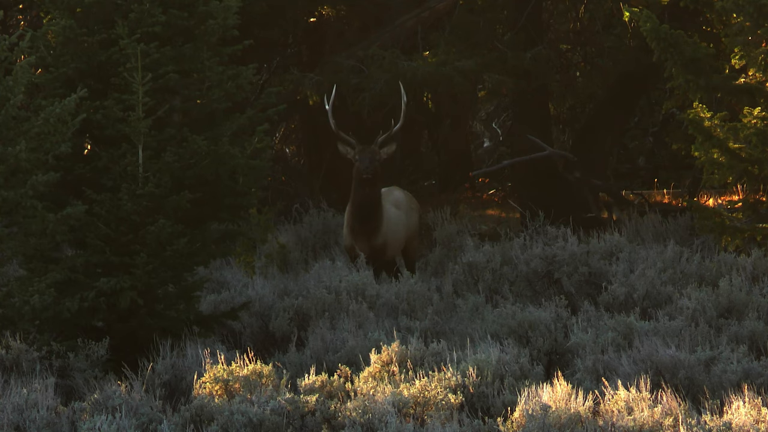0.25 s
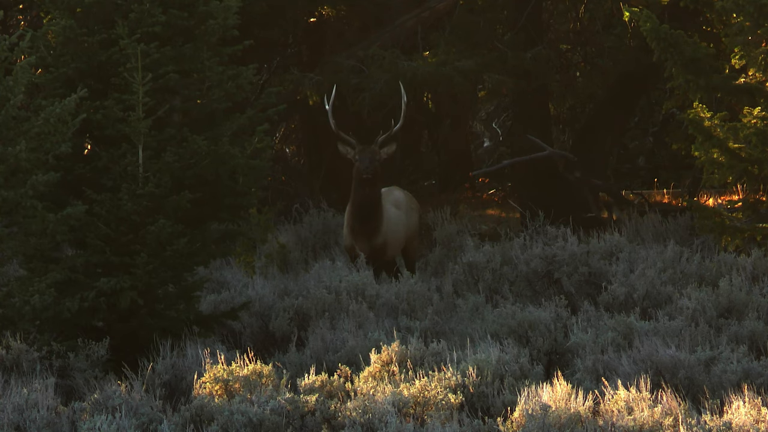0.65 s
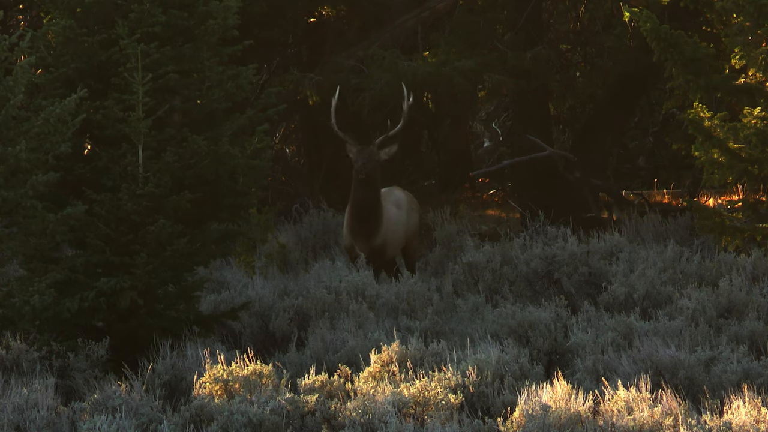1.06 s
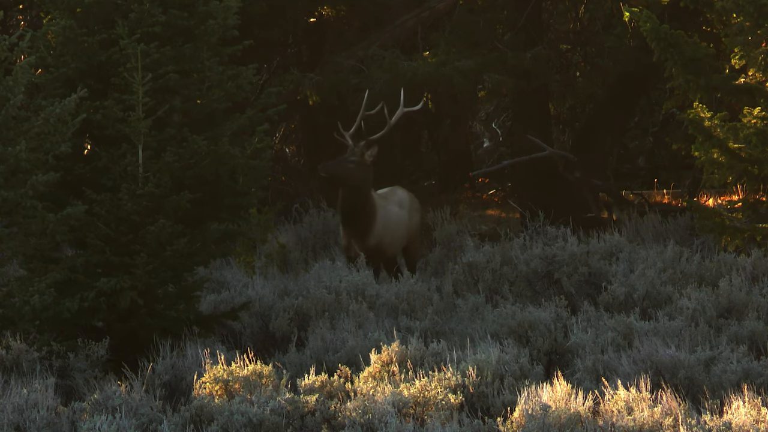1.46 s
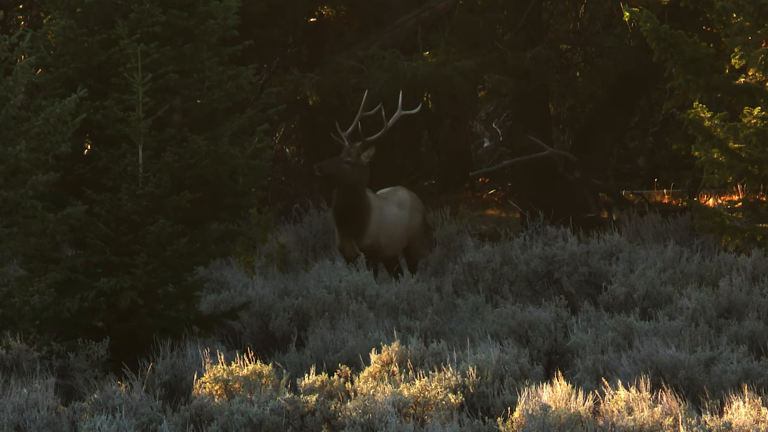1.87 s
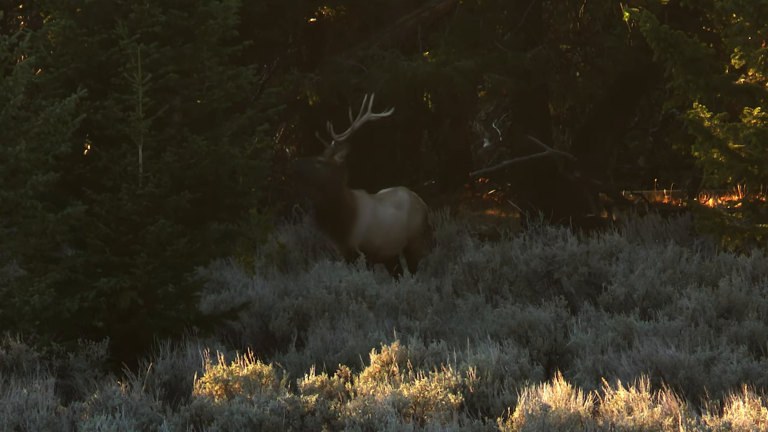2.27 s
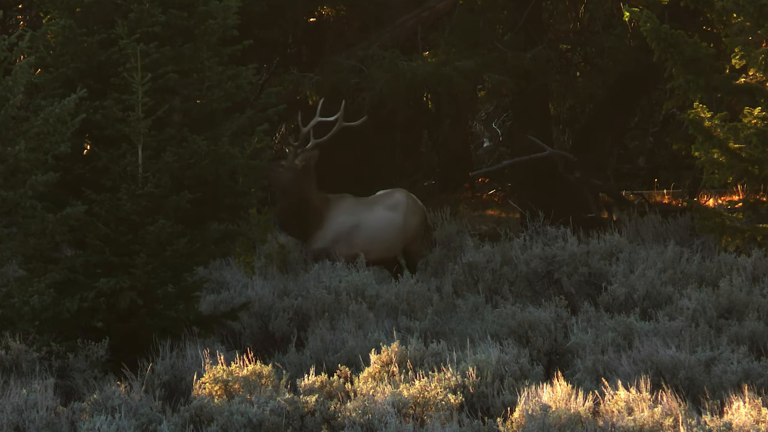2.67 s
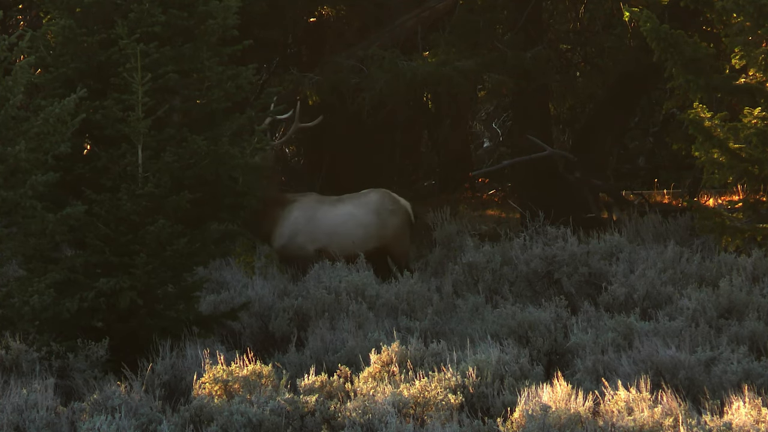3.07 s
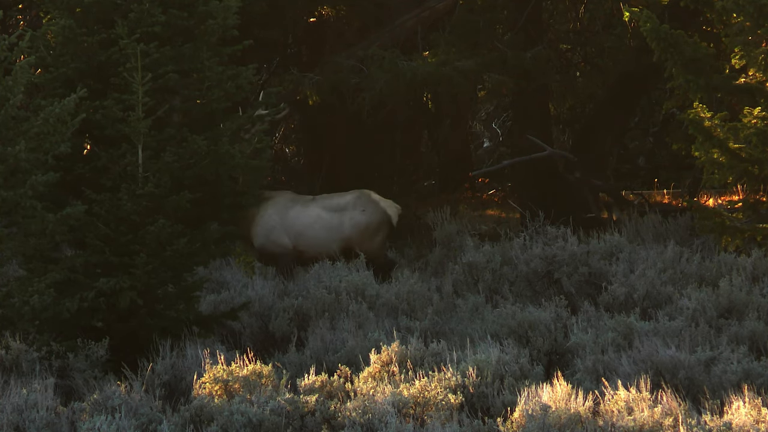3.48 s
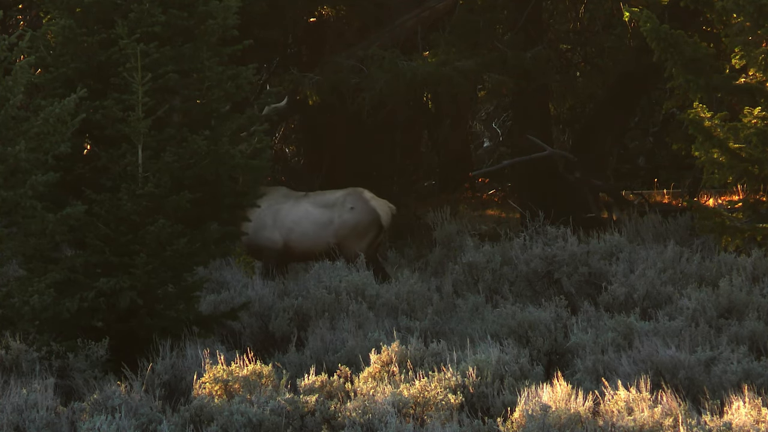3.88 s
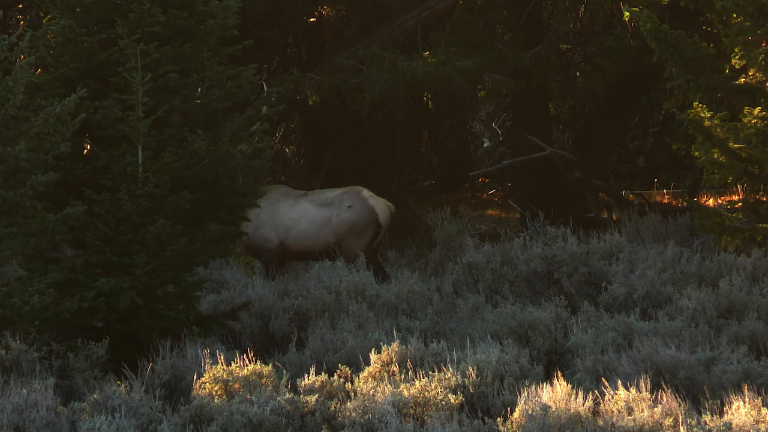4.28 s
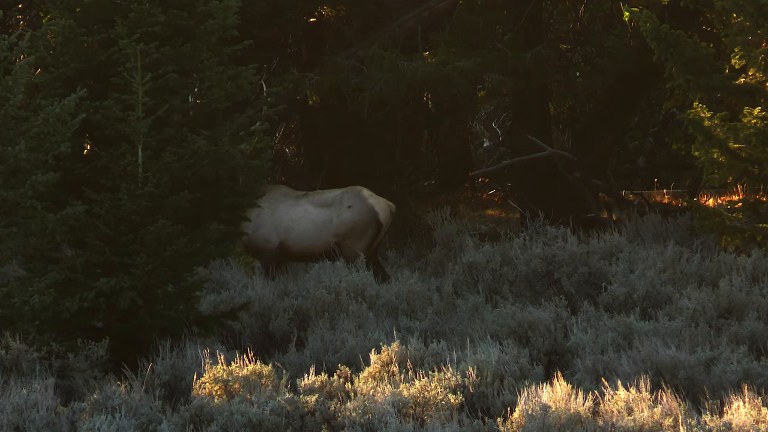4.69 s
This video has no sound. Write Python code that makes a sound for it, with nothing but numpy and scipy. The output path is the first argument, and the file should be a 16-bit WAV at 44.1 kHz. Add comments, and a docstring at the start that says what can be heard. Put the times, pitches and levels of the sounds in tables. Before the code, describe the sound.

A quiet forest edge in stereo, with a very low, still air floor. Throughout, a faint narrow hiss rises and drops every 0.6 to 0.7 seconds, slightly stronger on the right and carrying a trace of ring. In the first 0.5 seconds thin far birds give a few tiny descending chirps, with another weak one near 1.0. At 1.96 a loud, close mew bursts in: a thin high note held very briefly, then a steep, stepping slide down, growing raspy, over in 0.2 seconds. Brush and trees scatter a short echo, and the microphone overloads with a slight low thump. A tiny high chirp follows at 2.3, then a dry twig snap around 2.4 to 2.5. A faint high ring swells and fades around 3.4, with a soft brush swish at 3.5 and very faint chirps at 3.6 to 3.8. At 4.54 a second, slightly shorter mew falls the same way, and its echo fades into hiss.

```python
"""Two mewing calls, as from a reed elk call, loud and close: each holds a thin high note, then slides down, raspy.
Behind them a faint hiss swells again and again, a thin ring comes and goes, far birds chirp and the brush snaps.
Mews are gliding harmonics through fixed resonances plus puffed noise; the birds are gliding sines; air, hiss,
ring and brush are shaped noise. Bushes and trees scatter echoes and the microphone overloads a little."""
import sys
import numpy as np
from scipy import signal
from scipy.fft import rfft, irfft
from scipy.io import wavfile

SR = 44100
rng = np.random.default_rng(int(sys.argv[2]) if len(sys.argv) > 2 else 0)


def transcribe(signal):
    """Save signal, clipped to [-1, 1], as a 16-bit WAV file at the path in sys.argv[1]."""
    frames = np.atleast_2d(signal).T
    limited = np.clip(frames, -1, 1)
    pcm = np.round(limited * 32767).astype(np.int16)
    wavfile.write(sys.argv[1], SR, pcm)


N = 213355
TIME = np.arange(N) / SR
BINS = np.fft.rfftfreq(N, 1 / SR)
EDGE_HZ = 15780  # upper band limit


def gain_of(db):
    """Amplitude factor of a level in dB."""
    return 10 ** (np.asarray(db) / 20)


def evened(x):
    """Scale to unit RMS."""
    return x / np.sqrt(np.mean(x ** 2) + 1e-20)


def read(points, hz):
    """A spectrum table, joined by straight lines over log frequency."""
    f, value = np.transpose(points)
    return np.interp(np.log(hz + 1), np.log(f + 1), value)


def noise(colour_db, same):
    """Two channels of coloured noise, unit RMS overall, with a given correlation."""
    a, b = rfft(rng.standard_normal((2, N)))
    same = np.clip(same, -1, 1)
    pair = np.array([a, same * a + np.sqrt(1 - same ** 2) * b])
    return evened(irfft(pair * gain_of(colour_db), N))


def smooth(x, hz):
    """Gentle low-pass without delay."""
    return signal.sosfiltfilt(signal.butter(2, hz, fs=SR, output="sos"), x)


def wander(size, hz):
    """Low-passed random drift of unit RMS."""
    drift = smooth(rng.standard_normal(size + 8000), hz)
    return evened(drift[4000:-4000])  # filter ends cut off


def air(level_db=-62.5, dip_db=-5, dip_hz=720, dip_octaves=0.55):
    """Still air: steady outdoor noise floor, hollow in the low mids."""
    # relative spectrum: (frequency [Hz], density [dB per Hz])
    colour = [(15, -53.5), (25, -4), (93, -1.5), (204, 1.5), (331, -1), (826, -20.5), (997, 1),
              (1080, -5.5), (1710, -11), (2170, -17.5), (2700, -12), (4040, -17), (6380, -28), (9550, -20),
              (15500, -16.5)]
    # left-right correlation: (frequency [Hz], correlation [-1 to 1])
    likeness = [(60, -0.22), (130, 0.29), (290, -0.17), (640, 0.58), (1410, 0.29), (3100, -0.21),
                (6820, 0.94), (15000, 0.32)]
    hollow_db = dip_db * np.exp(-(np.log2((BINS + 1) / dip_hz) / dip_octaves) ** 2)
    return gain_of(level_db) * noise(read(colour, BINS) + hollow_db, read(likeness, BINS))


def hiss(right_db=3.0, rise_s=0.12, fall_s=0.07, rest_db=-68.0, growth_db=4.5, flicker_db=.5,
         ring_hz=1990, ring_width_hz=45, ring_db=3):
    """A narrow hiss with a faint ring in it swells and drops about one and a half times a second."""
    # relative spectrum: (frequency [Hz], density [dB per Hz])
    colour = [(300, -32.5), (800, -19), (1050, -17.5), (1700, -7.5), (2000, -2), (2260, 1.5), (2750, -8),
              (3200, -15.5), (4200, -25.5), (7000, -28), (15000, -67)]
    # swells: (start [s], end [s], level reached at the end, before the fade [dB])
    swells = [(-.2, 0.343, -57.5), (0.444, 1.024, -57.5), (1.054, 1.58, -57), (1.65, 2.256, -56.5),
              (2.35, 2.993, -56.5), (3.05, 3.604, -57), (3.633, 4.241, -57), (4.3, 4.872, -57.5)]
    level = np.full(N, gain_of(rest_db))
    for start, end, db in swells:
        gate = np.clip(np.minimum((TIME - start) / rise_s, (end - TIME) / fall_s), 0, 1)
        swell_db = np.interp(TIME, [start, end], [db - growth_db, db])
        level = np.maximum(level, gate * gain_of(swell_db))
    colour_db = read(colour, BINS) + ring_db / (1 + ((BINS - ring_hz) / ring_width_hz) ** 2)
    ports = gain_of([[-right_db / 2], [right_db / 2]])
    flicker = gain_of(flicker_db * wander(N, 30))
    return flicker * level * ports * noise(colour_db, same=0.47)


def whine(level_db=-69, centre_hz=1990, width_hz=35, peak_s=3.38, spread_s=0.79):
    """A faint narrow band of noise, heard as a ring, comes and goes once."""
    band_db = -20 * np.log10(1 + ((BINS - centre_hz) / width_hz) ** 2)
    bell = np.exp(-((TIME - peak_s) / spread_s) ** 2)
    return gain_of(level_db) * bell * noise(band_db, same=.5)


def birds(blur=0.0365, blur_hz=410, echo_db=14):
    """Thin far whistles: gliding sines with unsteady pitch, blurred by the trees."""
    # chirps: (time [s], length [s], start pitch [Hz], end pitch [Hz], direct level [dB])
    chirps = [(0.02, 0.037, 6500, 6400, -79.5), (0.096, 0.045, 6530, 6200, -70),
              (0.18, 0.072, 6250, 6200, -76), (0.273, 0.094, 5900, 5540, -75),
              (0.341, 0.14, 4500, 4170, -80), (0.967, 0.27, 3970, 3840, -79.5),
              (2.298, 0.021, 7900, 8230, -69.5), (3.592, 0.079, 6700, 7500, -84),
              (3.73, 0.063, 6550, 6330, -80)]
    out = np.zeros(N)
    for s, length, start_hz, end_hz, db in chirps:
        count = int(length * SR)
        hz = np.linspace(start_hz, end_hz, count) * (1 + blur * wander(SR // 2, blur_hz)[:count])
        whistle = np.sin(2 * np.pi * np.cumsum(hz) / SR)
        whistle = whistle * signal.windows.tukey(count, .3) * np.linspace(1, .4, count)
        out[int(s * SR):][:count] += gain_of(db) * evened(whistle)
    return out + gain_of(echo_db) * forest(np.array([out, out]))


def forest(x, build_s=0.012):
    """Many faint echoes from brush and trunks build up and die, each band at its own speed."""
    # scattered level: (frequency [Hz], level [dB])
    scatter = [(400, -31.5), (1550, -34), (1900, -31), (2600, -26), (3000, -9), (3200, -23), (3450, -13.5),
               (4150, -21.5), (4800, -21), (7000, -17), (14000, -29)]
    # decay by 60 dB: (frequency [Hz], time [s])
    scatter_t60 = [(500, .35), (1500, 0.89), (3000, 0.5), (6000, 0.42), (12000, 0.23)]
    taps = rng.standard_normal((2, SR)) * (rng.random((2, SR)) < .08)
    hz, t, z = signal.stft(taps, SR, nperseg=256)
    fade = gain_of(-60 * t / read(scatter_t60, hz)[:, None]) * (1 - np.exp(-t / build_s))
    fade *= gain_of(read(scatter, hz))[:, None] / np.sqrt(np.mean(fade ** 2, axis=1, keepdims=True))
    tail = signal.istft(z * fade, SR, nperseg=256)[1] / np.linalg.norm(taps[0])
    return signal.fftconvolve(x, tail, axes=1)[:, :N]


def pitch(t, hold_s, octaves_per_s):
    """A held high note, then a steady slide with a rounded skip as each low harmonic crosses the main resonance."""
    # starts a little flat, flicks up towards the top target and settles
    start_hz, top_target_hz, held_hz, flick_s, settle_s = 1532, 1647, 1557, .004, .027
    resonance_hz, first_skip_octaves, skip_shrink_octaves, skip_s = 2746, .355, .08, 0.00443
    target_hz = np.interp(t, [0, flick_s], [start_hz, top_target_hz])
    held = held_hz + (target_hz - held_hz) * np.exp(-np.maximum(t, 0) / settle_s)
    fallen = octaves_per_s * skip_s * np.logaddexp(0, (t - hold_s) / skip_s)  # octaves
    skipped = 0
    for k in range(2, 7):
        skip = first_skip_octaves - skip_shrink_octaves * (k - 2)
        crossing_s = hold_s + (np.log2(k * held_hz / resonance_hz) - skipped - skip / 2) / octaves_per_s
        fallen = fallen + skip / (1 + np.exp((crossing_s - t) / skip_s))
        skipped += skip
    return held * 2 ** -fallen


def loudness(t, hz, length_s, release_db_per_s):
    """Effort in dB (attack, accent, release) and, relative to it, fundamental, overtones, treble and rasp."""
    # registers, dull and raspy at low pitch:
    # (pitch [Hz], fundamental [dB], overtones [dB], treble [dB], rasp [dB])
    registers = [(460, 9.5, -5, -22, -15), (680, 4.5, -2, 5, -12), (864, -7, 0, 5, -15.5),
                 (1090, -1, 3, -2, -18), (1270, 2, 0, 2, -19.5), (1460, 2, 1, -0.5, -47)]
    attack_db_per_s, accent_db, accent_at_s, accent_s = 2298, 8.5, 0.00274, 0.0067
    # overtones start later and stop sooner than the fundamental
    overtones_db, late_s, overtones_attack_db_per_s, early_s = 3.5, 0.0035, 2198, 0.011
    effort = (attack_db_per_s * np.minimum(t, 0)
              + accent_db * np.exp(-((t - accent_at_s) / accent_s) ** 2)
              - release_db_per_s * np.maximum(t - length_s - early_s, 0))
    bright = (overtones_attack_db_per_s * np.minimum(t - late_s, 0)
              - release_db_per_s * np.clip(t - length_s, 0, early_s))
    at_hz, *columns = np.transpose(registers)
    fundamental, overtones, treble, rasp = (np.interp(hz, at_hz, c) for c in columns)
    return effort, fundamental, overtones_db + overtones + bright, treble, rasp + bright


def mew(start, hold_s, length_s, octaves_per_s, release_db_per_s, level_db,
        slope_db_per_octave=-6, fundamental_db=4, top_db_per_harmonic=-1.0, jitter_at_0db_rasp=0.022,
        rasp_db=-22.0, comb_db=4, comb_hz=1190, grain_db=1.0, shimmer_db=4.0, shimmer_hz=90, build_s=0.00271):
    """A stack of harmonics glides through fixed resonances, each flaring as it crosses one."""
    # colour at each microphone port: (frequency [Hz], level [dB])
    left_colour = [(480, -65), (850, -65.5), (1300, -37.5), (1600, -35), (1830, -36), (2050, -49),
                   (2500, -22), (2630, -13.5), (2830, -32), (3190, -21), (3550, -30.5), (4000, -41),
                   (6100, -46.5), (9500, -53), (15000, -73.5)]
    right_colour = [(480, -64.5), (820, -50.5), (1300, -32.5), (1560, -31), (1740, -38.5), (2480, -18.5),
                    (2620, -16.5), (2850, -30.5), (3280, -22.5), (3900, -28), (4300, -38.5), (6000, -49.5),
                    (8000, -50), (9500, -48.5), (15000, -71)]
    # lead of the left port: (frequency [Hz], phase [rad])
    lead = [(500, -2), (750, -3), (1300, 1.53), (2000, -3.5), (2500, -1.5), (2900, -2.5), (3250, -4.5),
            (5200, -4.5), (6500, -5.5)]
    # relative spectrum of the air rasp: (frequency [Hz], density [dB per Hz])
    rasp_colour = [(400, -40.5), (800, -55), (1500, -26), (2500, -1), (3400, 12), (4000, -11),
                   (4700, -16.5), (7400, -23), (8800, -11), (11200, -16), (12200, -26), (15500, -28)]
    span = (TIME >= start - .025) & (TIME < start + length_s + .05)
    t = TIME[span] - start
    hz = pitch(t, hold_s, octaves_per_s)
    effort, fundamental, overtones, treble, rasp = loudness(t, hz, length_s, release_db_per_s)
    # as the tension drops the cycles grow uneven
    hz = hz * (1 + jitter_at_0db_rasp * gain_of(rasp) * wander(N, 400)[span])
    phase = 2 * np.pi * np.cumsum(hz) / SR
    voice = np.zeros((2, len(t)))
    for k in np.arange(1, 25):
        f = k * np.interp(t - build_s, t, hz)  # the resonances take a moment to build up
        source_db = slope_db_per_octave * np.log2(k / 2) + top_db_per_harmonic * max(k - 8, 0)
        source_db = source_db + (fundamental_db + fundamental if k == 1 else overtones)
        # the treble is combed by a very near reflection, and each high partial shimmers on its own
        shimmer = shimmer_db * wander(SR // 2, shimmer_hz)[:len(t)]
        ripple_db = comb_db * np.cos(2 * np.pi * f / comb_hz) + shimmer
        source_db = source_db + ripple_db * np.interp(f, [3500, 6000], [0, 1])
        source_db = source_db + treble * np.interp(f, [3700, 4500], [0, 1])
        port_db = np.array([read(left_colour, f), read(right_colour, f)])
        size = gain_of(source_db + port_db) * (f < EDGE_HZ)
        voice += np.sqrt(2) * size * np.cos([k * phase + read(lead, f), k * phase])
    # air escapes in a puff on each cycle, in uneven spurts
    rasp_same = np.interp(BINS, [4000, 7000], [-.3, .65])
    puffs = noise(read(rasp_colour, BINS), same=rasp_same)[:, span]
    puffs = puffs * (1 + np.cos(phase)) * gain_of(grain_db * wander(N, 120)[span])
    call = voice + gain_of(rasp_db + rasp) * puffs
    out = np.zeros((2, N))
    out[:, span] = gain_of(level_db + effort) * call * signal.windows.tukey(len(t), .03)
    return out


def bushes(x, level_db=-14, first_s=.007, decay_s=0.0028, taps_per_s=700, centre_hz=3500, octaves=1.0):
    """Quick echoes from the nearest bushes trail each gliding partial and beat with it."""
    t = np.arange(SR // 8) / SR
    taps = rng.choice([-1, 1], (2, len(t))) * (rng.random((2, len(t))) < taps_per_s / SR)
    taps = taps * (t > first_s) * np.exp(-t / decay_s)
    taps = taps / np.linalg.norm(taps, axis=1, keepdims=True)
    echoes = signal.fftconvolve(x, taps, axes=1)[:, :N]
    band = 1 / np.sqrt(1 + (np.log2((BINS + 1) / centre_hz) / octaves) ** 8)
    return gain_of(level_db) * irfft(rfft(echoes) * band, N)


def brush():
    """Twigs snap and branches swish: short bursts of band noise, tilted towards the lows."""
    # bursts: (time [s], rise [s], decay [s], band centre [Hz], half-width [octaves], peak level [dB])
    snaps = [(2.378, .0021, .0064, 1300, .3, -58.5), (2.477, .0004, .0018, 2140, .43, -42.5),
             (2.474, .0021, .0042, 410, .35, -52.5), (3.478, .018, .022, 3270, .65, -63.5)]
    out = np.zeros((2, N))
    for s, rise, decay, hz, octaves, db in snaps:
        shape = np.clip((TIME - s) / rise, 0, 1) * np.exp(-np.maximum(TIME - s - rise, 0) / decay)
        band_db = -10 * np.log10(1 + (np.log2((BINS + 1) / hz) / octaves) ** 4)
        tilt_db = -10 * np.log10(1 + BINS / hz)
        out += gain_of(db) * shape * noise(band_db + tilt_db, same=0.73)
    return out


def scene():
    """Sum the mews with their echoes and the background layers."""
    # mews: (start [s], held note [s], whole length [s], slide [octaves/s], release [dB/s], level [dB])
    mews = [(1.956, .07, 0.203, 5.45, 1895, -5), (4.542, .0675, 0.16, 6.05, 1118, -5)]
    calls = sum(mew(*row) for row in mews)
    background = air() + hiss() + whine() + birds() + brush()
    return calls + bushes(calls) + forest(calls) + background


def record(dry, thump_db=6, flutter_db=-19.0):
    """Overload turns the loud envelope into a thump, opposite in the two ports, and a flutter; then the band limit."""
    # relative spectrum of the low flutter: (frequency [Hz], density [dB per Hz])
    flutter_colour = [(15, 0.5), (45, -11), (100, -7), (170, -19), (350, -24.5), (600, -45.5), (2000, -87)]
    power = np.maximum(smooth((dry ** 2).mean(0), 130), 0)
    thump = signal.sosfilt(signal.butter(1, 12, "high", fs=SR, output="sos"), power)
    flutter = np.sqrt(power) * noise(read(flutter_colour, BINS), same=-0.22)
    wet = dry + gain_of(thump_db) * np.array([thump, -thump]) + gain_of(flutter_db) * flutter
    low_pass = signal.firwin(701, EDGE_HZ, window=("kaiser", 9), fs=SR)
    return signal.oaconvolve(wet, low_pass[None], "same")


dry = scene()
out = record(dry)
transcribe(out)
```